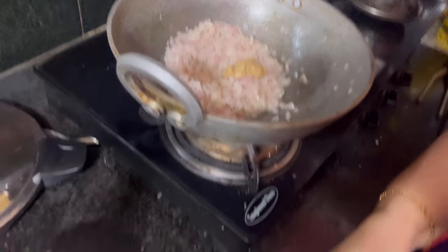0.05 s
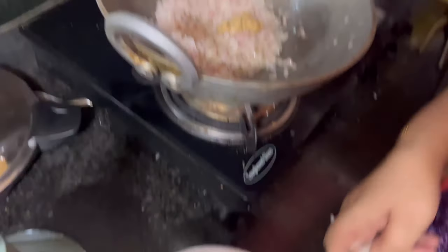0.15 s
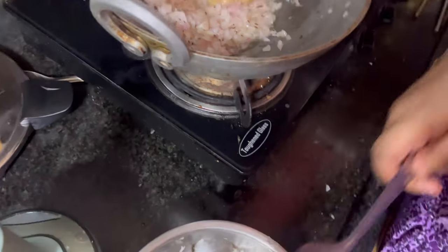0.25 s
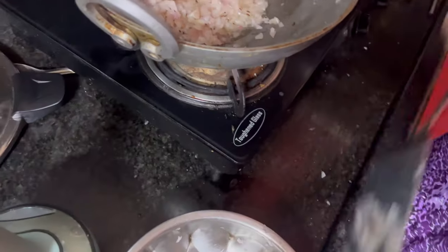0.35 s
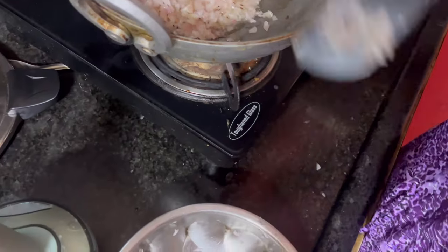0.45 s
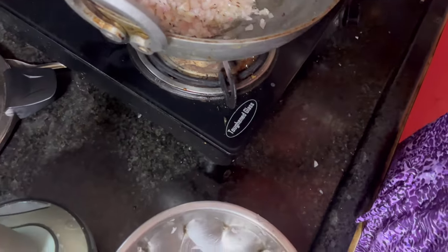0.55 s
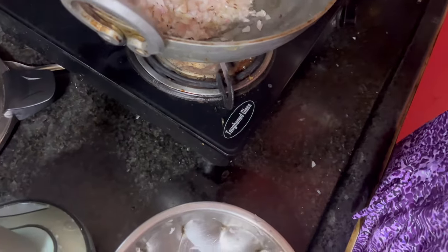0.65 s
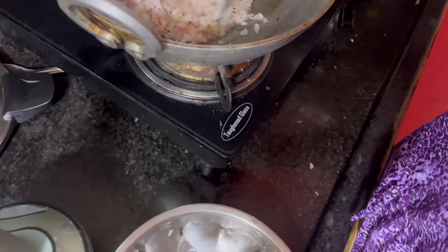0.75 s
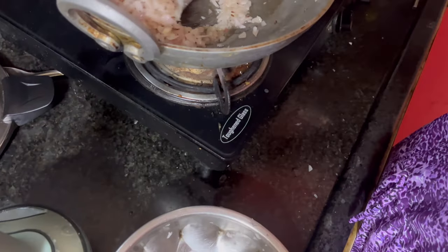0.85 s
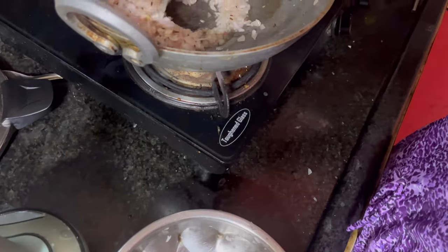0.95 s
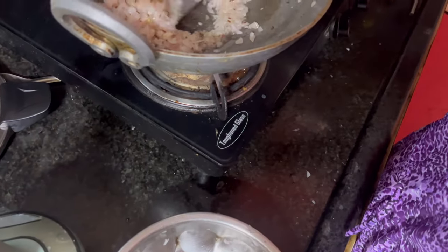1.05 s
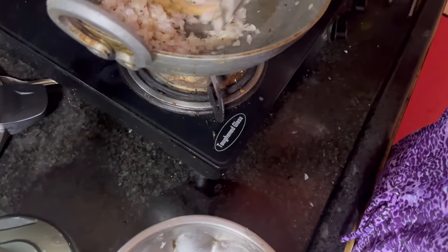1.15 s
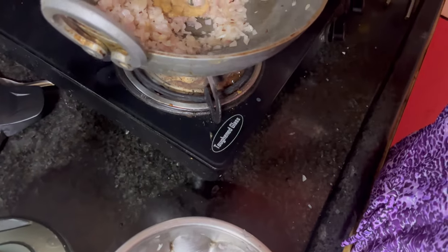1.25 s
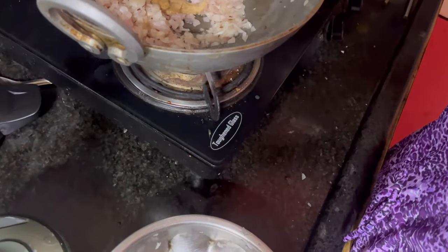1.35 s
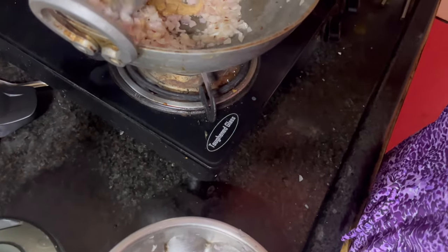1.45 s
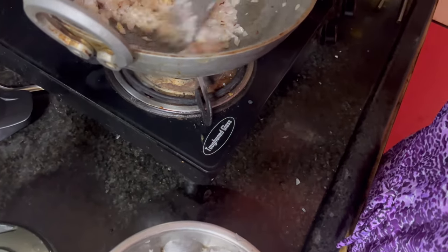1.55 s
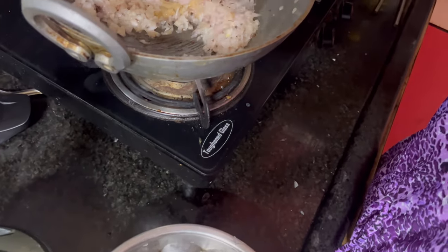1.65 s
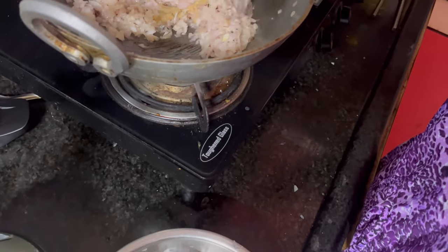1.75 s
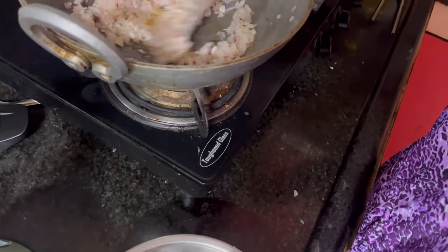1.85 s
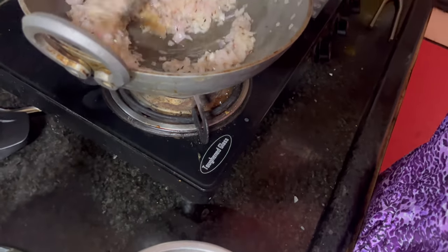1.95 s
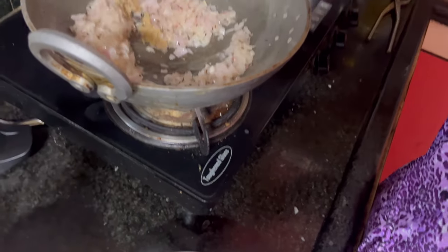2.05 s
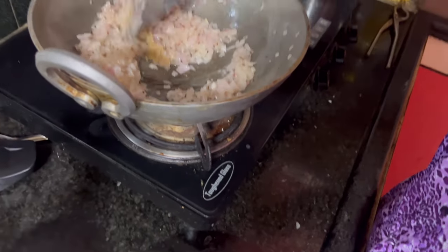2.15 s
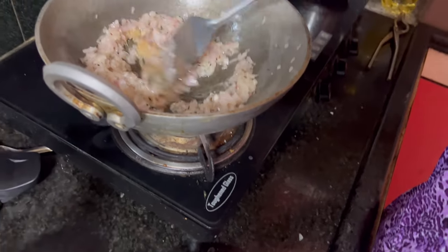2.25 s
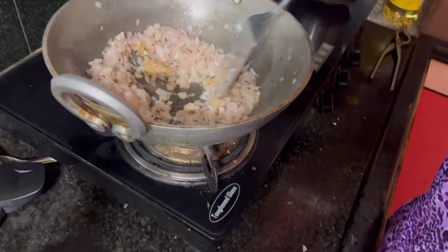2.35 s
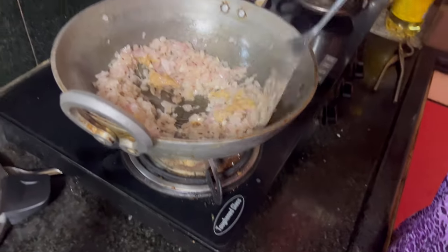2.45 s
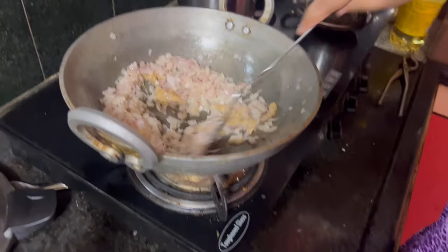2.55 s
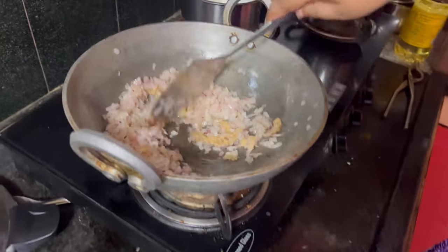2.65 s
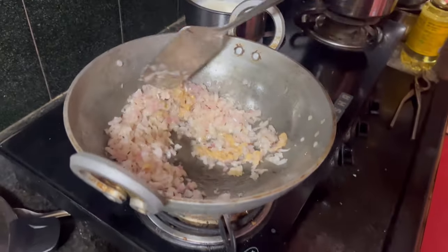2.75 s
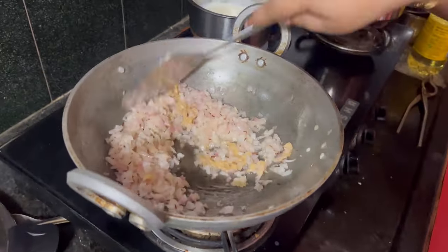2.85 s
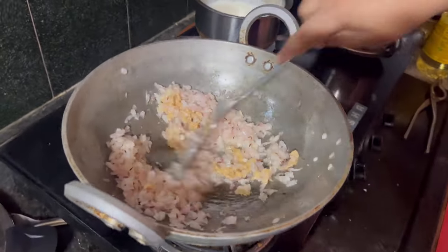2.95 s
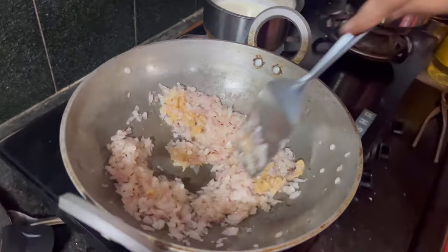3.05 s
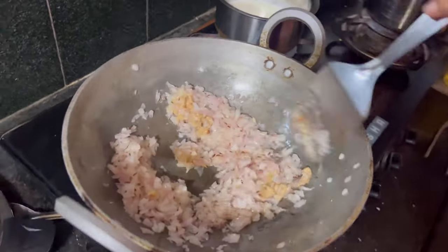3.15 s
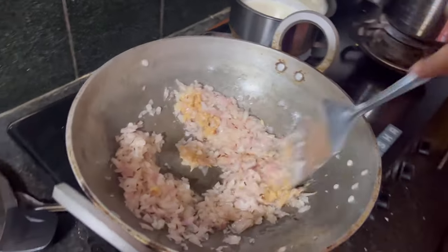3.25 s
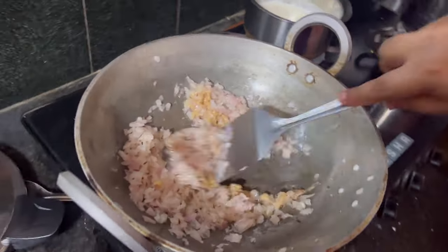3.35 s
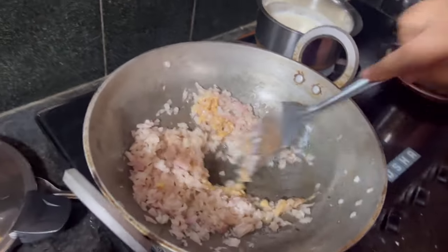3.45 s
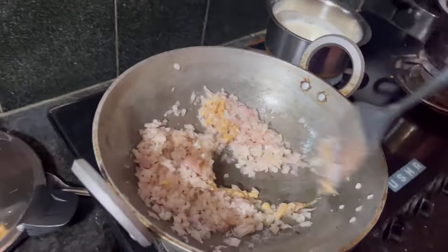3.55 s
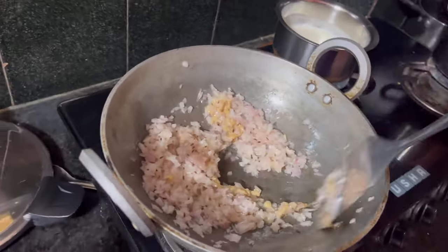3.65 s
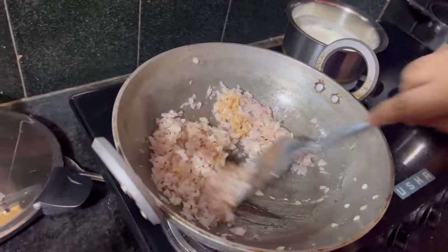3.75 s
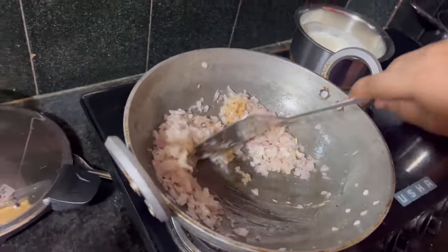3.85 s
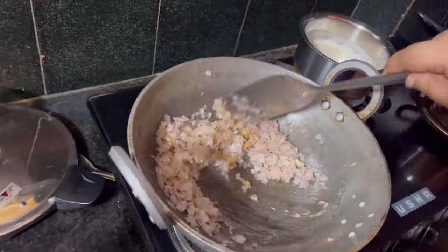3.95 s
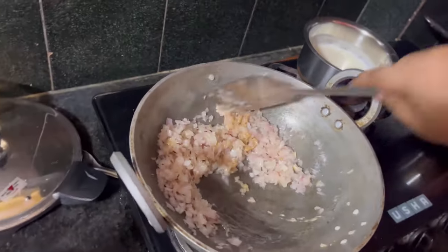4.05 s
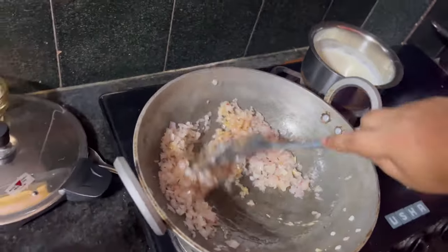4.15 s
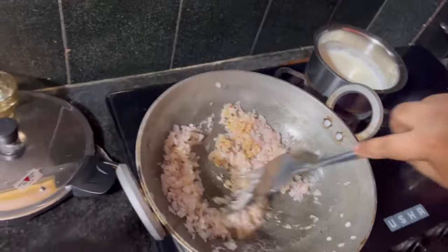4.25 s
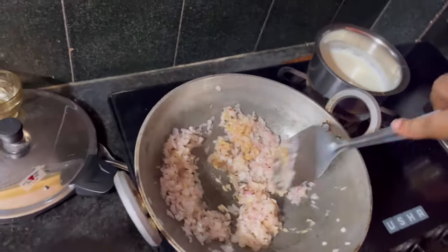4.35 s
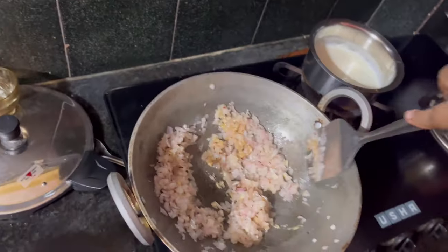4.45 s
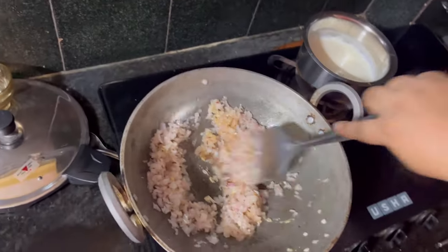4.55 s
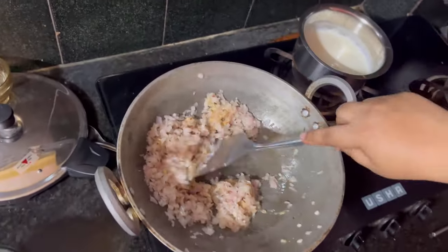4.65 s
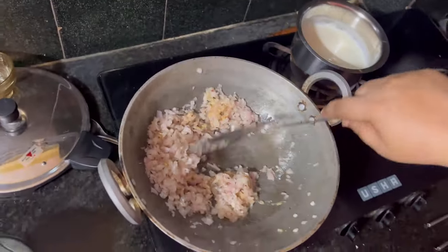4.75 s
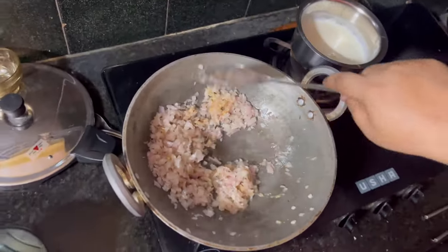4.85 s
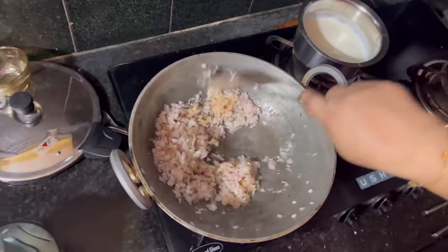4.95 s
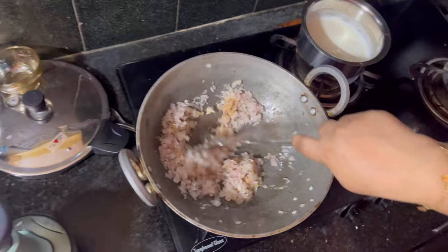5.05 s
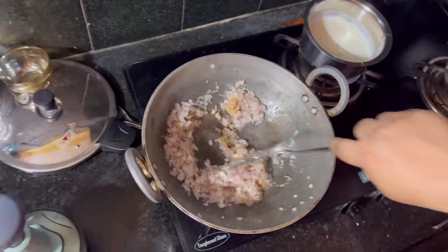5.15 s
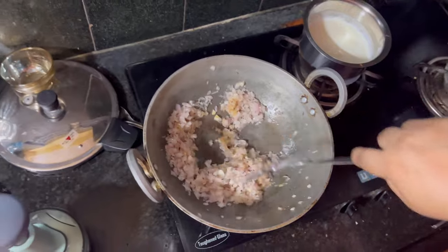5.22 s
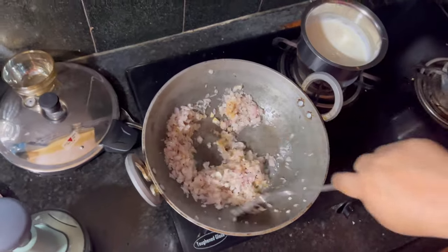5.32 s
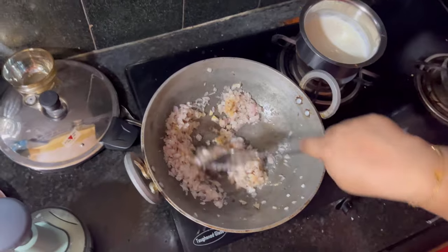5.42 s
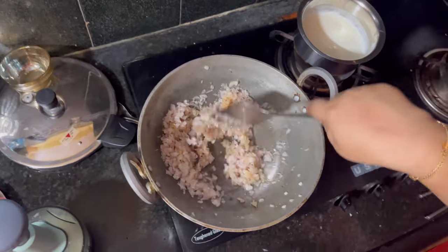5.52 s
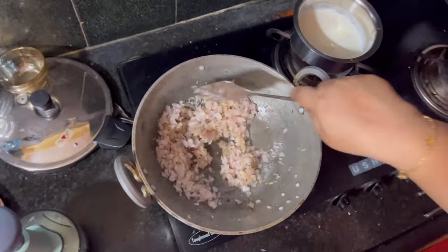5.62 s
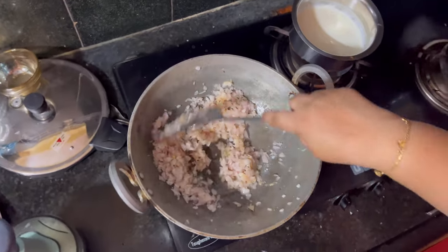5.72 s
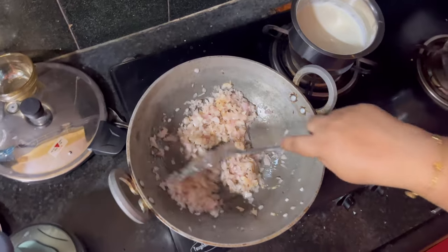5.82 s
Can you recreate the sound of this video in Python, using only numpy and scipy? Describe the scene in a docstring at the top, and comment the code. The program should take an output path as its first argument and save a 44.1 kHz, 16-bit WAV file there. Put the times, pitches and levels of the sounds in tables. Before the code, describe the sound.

In a small tiled kitchen, a steel spatula is dragged from a thin metal bowl with a ringing clank and low groan. After a quieter gap it stirs onions in a metal pan: sharp clanks, brief scrapes and muffled knocks, about two a second later on. Faint sizzle and gas flame run underneath. Close phone microphone, mono.

```python
"""Spatula, bowl and frying onions

In a small tiled kitchen a steel spatula is dragged out of a steel bowl, then stirs onions in a metal pan.
Its blade clanks, scrapes and knocks: showers of tiny impacts ring the modes of the vessel.
The bowl groans and the pan hums as sums of sines; pushed onions rustle as band-passed grains.
Shaped noise makes the faint sizzle and the gas flame; the tiles answer each touch of the blade on metal.
A phone microphone takes it all from one point, in mono."""
import sys
import numpy as np
from scipy import signal
from scipy.fft import rfft, irfft, next_fast_len
from scipy.io import wavfile
from scipy.ndimage import map_coordinates

SR = 44100
rng = np.random.default_rng(int(sys.argv[2]) if len(sys.argv) > 2 else 0)


def to_wav(s):
    """Save 16-bit WAV."""
    ch = np.atleast_2d(s).T  # columns
    pcm = np.round(np.clip(ch, -1, 1) * 32767)  # PCM
    wavfile.write(sys.argv[1], SR, pcm.astype(np.int16))


N = 259308
BOWL_UNTIL = 1  # s, contacts starting before this are on the bowl, later ones on the pan


def amp(db):
    """Decibels to gain."""
    return 10 ** (np.asarray(db) / 20)


def unit(x):
    """Scale to rms 1."""
    return x / np.sqrt(np.mean(x ** 2) + 1e-20)


def clock(seconds):
    """Sample times from zero."""
    return np.arange(int(seconds * SR)) / SR


def along(points, hz):
    """Join (Hz, value) points on a log frequency axis."""
    points_hz, values = np.transpose(points)
    return np.interp(np.log(hz + 1), np.log(points_hz), values)


def filtered(x, response):
    """Apply a gain that depends on frequency."""
    size = next_fast_len(len(x) + 8192)
    gain = response(np.fft.rfftfreq(size, 1 / SR))
    return irfft(rfft(x, size) * gain, size)[:len(x)]


def coloured(x, spectrum):
    """Weight x by a spectrum in dB and scale it to rms 1."""
    return unit(filtered(x, lambda hz: amp(along(spectrum, hz))))


def band(x, lo_hz, hi_hz, order):
    """Causal band-pass."""
    edges_hz = [lo_hz, min(hi_hz, SR / 2 - 1)]
    return signal.sosfilt(signal.butter(order, edges_hz, 'bandpass', fs=SR, output='sos'), x)


def add(track, s, sound):
    """Mix a sound in at time s, cut to fit the track."""
    start = round(s * SR)
    part = sound[max(-start, 0):max(N - start, 0)]
    track[max(start, 0):][:len(part)] += part


def slips(size, rate, spread_db):
    """Random tiny impacts of uneven strength and either sign, rate a second."""
    lands = rng.random(size) < rate / SR
    strength = amp(spread_db * rng.standard_normal(size).clip(-2, 2))
    return lands * strength * rng.choice([-1, 1], size)


def wobble(size, rate):
    """A smooth random curve, rate knots a second."""
    knots = rng.standard_normal(int(size * rate / SR) + 4)
    return map_coordinates(knots, [np.arange(size) * rate / SR])


# Modes of pan and blade together: mode_hz [Hz], level_db [dB relative]
PAN = [(352, -16), (420, -12.5), (660, -7), (748, -10.5), (830, -8), (997, -9), (1106, -8.5), (1210, -11.5),
       (1335, -26), (1593, -7), (1665, -2.5), (1884, -8), (2130, -11), (2348, -25), (2778, -4), (3331, -12),
       (4030, -4.5), (4154, -2.5), (4517, -4), (4680, -7.5), (5014, -0.5), (5134, 0), (5444, -11.5),
       (7531, -16.5), (7999, -13), (9280, -31), (10072, -17)]
# Modes of the steel bowl: mode_hz [Hz], level_db [dB relative]
BOWL = [(800, -1.5), (1250, -1), (1500, -1.5), (1593, 0.5), (2140, -4), (2880, 7.5), (3100, -6),
        (3260, 4.5), (3478, 1), (3700, -7), (4220, -1), (4970, -0.5), (5457, -4), (5600, -1), (8550, -5),
        (9750, -15), (10400, -13)]
# Decay of modes damped by food and hand, at freedom 1: mode_hz [Hz], t60_s [s]
RING = [(350, .2), (450, .15), (1600, .1), (4000, .075), (10000, .07)]
# Spectrum of the crowd of weaker plate modes: freq_hz [Hz], level_db [dB per Hz, relative]
PLATE = [(150, 15), (260, -5), (520, -3.5), (780, -2), (1150, 0.5), (1420, -4), (1700, 3), (2400, 2),
         (3100, 3.5), (3650, -1.5), (4300, 3.5), (5500, 1.5), (6300, -6), (10400, -5.5), (11500, -15.5),
         (13500, -13), (15000, -18)]


def metal(force, s, favoured_hz, share_db, plate_db, plate_t60, freedom):
    """Ring the vessel; contact favours one mode, and a pressed blade (freedom < 1) shortens the modes."""
    t = clock(.5)

    def mode(hz):
        t60 = freedom * along(RING, hz)
        return unit(amp(-60 * t / t60) * np.sin(2 * np.pi * hz * t))

    def driven(response):
        return unit(signal.fftconvolve(force, response)[:len(force)])

    vessel = BOWL if s < BOWL_UNTIL else PAN
    ring = sum(amp(db) * rng.choice([-1, 1]) * mode(hz) for hz, db in vessel)
    # Each slip lands on a new spot, so the crowded plate modes add up in energy, with no common phase.
    energy = np.abs(signal.fftconvolve(force ** 2, amp(-60 * t / plate_t60) ** 2)[:len(force)])
    plate = coloured(rng.standard_normal(len(force)), PLATE) * np.sqrt(energy)
    body = unit(driven(ring) + amp(plate_db) * unit(plate))
    return body + amp(share_db) * driven(mode(favoured_hz))


# Registers of the metal, low, mid, high, top: low_edge_hz [Hz], high_edge_hz [Hz]
BANDS = [(340, 1300), (1300, 3850), (3850, 6000), (6000, 17000)]


def voiced(x, band_db, seconds):
    """The angle of the blade sets how strong each register is while the contact lasts."""
    sound = 0
    for (lo_hz, hi_hz), db in zip(BANDS, band_db):
        part = band(x, lo_hz, hi_hz, order=4)
        sound = sound + amp(db) * part / np.std(part[:int(seconds * SR)])
    return sound


# Register balance of a blow on each vessel: low_db, mid_db, high_db, top_db [dB]
PAN_STRUCK = (-3.5, -0.6, 3, -1.5)
BOWL_STRUCK = (-7.5, 8.5, 3, -4.5)


def struck_balance(s, brightness):
    """A bare edge tilts the ring to the treble, onion under the blade to the bass (dB per octave)."""
    octaves = np.log2(BANDS).mean(axis=1)
    balance = np.array(BOWL_STRUCK if s < BOWL_UNTIL else PAN_STRUCK)
    return balance + brightness * (octaves - octaves.mean())


CLANK_MODE_DB = -7  # favoured mode against the rest of the ring, at the usual chatter
CHATTER_S, WANDER_DB = .012, 5  # usual chatter; each doubling moves the blade and weakens that mode
# Blade strikes metal: start_s [s], chatter_s [s, decay constant], level_db [dB before register balance],
# brightness [dB per octave], favoured_hz [Hz]
CLANKS = [(0.072, 0.0067, -43.5, -4, 1654), (0.175, 0.026, -40.5, 2, 2130),
          (0.382, 0.011, -25.5, 1.4, 4247), (0.575, 0.019, -36, -1, 2806), (1.468, 0.0062, -29.5, -2, 1636),
          (1.841, 0.0047, -44.5, -1.5, 1647), (2.901, 0.0042, -22.5, 1.5, 4596),
          (3.253, 0.019, -25, 2.1, 7999), (3.645, 0.021, -26, 2.8, 5195), (4.162, .018, -26, -1.2, 5470),
          (4.493, 0.008, -23, 4, 5017), (4.985, 0.0024, -22.5, 2, 5013), (4.99, 0.0074, -25.5, 0.5, 2340),
          (5.368, 0.017, -24.5, 1.96, 5000), (5.746, 0.016, -26.5, -1, 2822)]


def clanks(blow=0.55, settle=0.0014):
    """A first blow, then the springy blade chatters to rest as a dying shower of impacts."""
    track, t = np.zeros(N), clock(.5)
    for s, chatter, db, brightness, favoured_hz in CLANKS:
        envelope = np.exp(-t / chatter) * (1 - np.exp(-t / settle))
        force = slips(len(t), rate=1000, spread_db=9) * envelope
        force /= np.linalg.norm(force)
        force[0] += blow * np.sqrt(CHATTER_S / chatter)  # the shorter the chatter, the harder the edge lands
        plate_db = 5 if s < BOWL_UNTIL else 1.5  # the thin bowl has more crowded modes
        share_db = CLANK_MODE_DB - WANDER_DB * np.log2(chatter / CHATTER_S)
        ring = metal(force, s, favoured_hz, share_db, plate_db, plate_t60=.03, freedom=1)
        add(track, s, voiced(kitchen(ring), db + struck_balance(s, brightness), 0.044))
    return track


# Register balance of a scrape on each vessel: low_db, mid_db, high_db, top_db [dB]
PAN_SCRAPED = (-3, 6.5, -0.2, -3.5)
BOWL_SCRAPED = (-22, 7, 1.7, -1)
# Gain of each register per dB of squeal: low, mid, high, top [dB per dB]
SQUEAL_SHARES = (-0.067, -0.54, 0.91, 0.31)


def scraped_balance(s, squeal_db):
    """A biting edge squeals in the high register and loses some of its rasp in the middle."""
    balance = np.array(BOWL_SCRAPED if s < BOWL_UNTIL else PAN_SCRAPED)
    return balance + squeal_db * np.array(SQUEAL_SHARES)


SCRAPE_MODE_DB = -1  # favoured mode against the rest of the ring
PRESS_SHARE = 0.33  # part of a scrape over which the hand bears down, before it lets go
# Blade slides on metal: start_s [s], length_s [s], level_db [dB before register balance],
# squeal_db [dB], favoured_hz [Hz]
SCRAPES = [(0.199, 0.039, -30, 6.5, 3090), (0.233, .14, -38.5, 7.5, 2900), (1.91, 0.065, -43, 15, 5145),
           (2.245, 0.084, -47, -0.5, 2776), (2.289, 0.086, -47, 10.5, 4620), (2.544, 0.063, -45, 4, 2160),
           (2.605, 0.041, -39, 15, 4590), (2.977, 0.064, -38.5, 8, 4630), (3.286, 0.051, -32.5, 4.5, 2150),
           (3.321, 0.083, -30.5, 13, 4570), (3.384, 0.068, -40, 9, 4210), (3.771, .12, -37.5, 13, 4530),
           (4.583, .06, -39.5, 6.5, 1598), (4.62, 0.032, -33.5, 14, 4730), (5.03, 0.082, -32.5, 6, 5130),
           (5.39, 0.037, -32.5, 9, 5450), (5.435, 0.057, -39.5, 10, 4610)]


def scrapes():
    """The edge sticks and slips in uneven bursts as the hand presses and lets go."""
    track, t = np.zeros(N), clock(.5)
    for s, length, db, squeal_db, favoured_hz in SCRAPES:
        pressure = np.interp(t / length, [0, PRESS_SHARE, 1], [.25, 1, .15]) * (t < length)
        on_rim = s < BOWL_UNTIL  # on the bowl's rim the blade bites harder and stutters
        judder_db = 9 if on_rim else 3.5
        pressure *= amp(judder_db * wobble(len(t), rate=220).clip(-1.5, 1))
        force = slips(len(t), rate=1900, spread_db=2.5) * pressure
        freedom = .38 / (1 + on_rim)
        ring = metal(force, s, favoured_hz, SCRAPE_MODE_DB, plate_db=-2.5, plate_t60=.008, freedom=freedom)
        add(track, s, voiced(kitchen(ring), db + scraped_balance(s, squeal_db), length))
    return track


# Dull knocks of the blade, mostly cushioned by onion: start_s [s], level_db [dB], pitch_hz [Hz]
KNOCKS = [(0.088, -31.5, 952), (1.474, -32, 694), (2.356, -35, 905), (2.512, -34, 970), (3.063, -28.5, 936),
          (3.128, -40.5, 613), (3.213, -34, 950), (3.367, -27.5, 994), (3.435, -41.5, 770),
          (4.175, -32, 688), (4.295, -42, 960), (4.732, -35.5, 982), (4.903, -44.5, 980), (5.05, -31, 720),
          (5.76, -28, 883), (5.868, -35.5, 960)]


def knocks(width=1.29, judder=0.0098, cushion=0.014):
    """Cushioned blows build up softly; only a band around the pitch and a low thud are heard."""
    track, t = np.zeros(N), clock(.5)
    for s, db, hz in KNOCKS:
        envelope = np.exp(-t / judder) * (1 - np.exp(-t / cushion))
        force = slips(len(t), rate=640, spread_db=6.0) * envelope
        ring = metal(force, s, hz, share_db=-12, plate_db=3, plate_t60=.02, freedom=.3)
        thud = amp(-10) * unit(band(ring, 250, 700, order=3))
        tone = unit(band(ring, hz / width, hz * width, order=2))
        dull = kitchen(tone + thud)
        add(track, s, amp(db) * dull / np.std(dull[:SR // 20]))
    return track


# The whole pan flexing: mode_hz [Hz], level_db [dB re the blow, before a random spread]
HUM = [(163, -34), (233, -20.5), (275, -21), (352, -34)]


def pan_hum(t60=0.74, spread_db=2):
    """Every clank on the pan leaves its slow bending modes humming, as decaying sines."""
    track, t = np.zeros(N), clock(.8)
    for s, chatter, blow_db, *_ in CLANKS:
        if s > BOWL_UNTIL:
            modes = 0
            for hz, db in HUM:
                modes = modes + amp(db + spread_db * rng.standard_normal()) * np.sin(2 * np.pi * hz * t)
            add(track, s, amp(blow_db - 60 * t / t60) * (1 - np.exp(-t / chatter)) * modes)
    return track


# The bowl bending under the drag: mode_hz [Hz], level_db [dB rms at drag 1]
FLEX = [(161.5, -40), (355.3, -37.5), (748.3, -49.5)]


def bowl_flex(start=0.11, ramp_end=0.32, end=0.31, t60=0.43):
    """The thin bowl groans while the blade is drawn over its rim, then its bending modes die away."""
    t = np.arange(N) / SR
    drag = np.interp(t, [start, ramp_end, end], [0, 1.2, .6]) * amp(-60 * np.maximum(t - end, 0) / t60)
    return drag * sum(amp(db) * np.sqrt(2) * np.sin(2 * np.pi * hz * t) for hz, db in FLEX)


# Onions pushed over the hot metal: start_s [s], length_s [s], level_db [dB before the swell], pitch_hz [Hz]
SWISHES = [(-0.04, 0.19, -41.5, 2030), (1.194, 0.31, -48.5, 4020), (5.142, 0.23, -46, 2450)]


def swishes(width=1.22):
    """Wet pieces rustle softly ahead of the blade: band-passed grains that swell and fade."""
    track = np.zeros(N)
    for s, length, db, hz in SWISHES:
        t = clock(length)
        grains = band(slips(len(t), rate=4000, spread_db=2), hz / width, hz * width, order=1)
        rustle = unit(band(grains, 300, 3200, order=2))
        add(track, s, amp(db) * rustle * np.sqrt(np.sin(np.pi * t / length)))
    return track


SIZZLE_DB, SIZZLE_DRIFT_DB = -49.5, 2  # level of the frying and its slow drift
# Spectrum of the frying: freq_hz [Hz], level_db [dB per Hz, relative]
SIZZLE = [(240, -70), (400, -24.5), (488, -9.5), (527, -5.5), (726, -3), (796, -6.5), (1240, -6),
          (2550, -12), (3620, -12), (3970, -7.5), (5650, -11), (6190, -23.5), (10100, -19.5), (14100, -50),
          (15500, -38)]
# Spectrum of the gas flame: freq_hz [Hz], level_db [dB per Hz, relative]
FLAME = [(20, -0.5), (45, -20), (65, -10), (120, -13), (165, -9), (300, -7.5), (480, -5.5), (800, -35.5)]


def stove():
    """The hiss of frying onions, noise and tiny bursts, over the low rush of the flame."""
    heat_db = SIZZLE_DB + SIZZLE_DRIFT_DB * wobble(N, rate=2.76) + 0.28 * wobble(N, rate=28)
    bursts = unit(slips(N, rate=1500, spread_db=4))  # tiny steam bursts in the oil
    sizzle = coloured(rng.standard_normal(N) + amp(-7.5) * bursts, SIZZLE)
    flame = coloured(rng.standard_normal(N), FLAME)
    return amp(heat_db) * sizzle + amp(-51.0) * flame


# Decay of the tiled room: freq_hz [Hz], t60_s [s]
KITCHEN = [(200, 0.47), (530, 0.26), (1400, 0.32), (3700, 0.25), (9700, 0.26), (15000, 0.12)]


def kitchen(x, gap=0.0012):
    """Direct sound plus an equally strong answer of the tiles, new for each contact of the blade."""
    hz, t, z = signal.stft(rng.standard_normal(SR // 2), SR, nperseg=256)
    decay = amp(-60 * t / along(KITCHEN, hz)[:, None])
    tail = signal.istft(z * decay, SR, nperseg=256)[1]
    tail *= 1 - np.exp(-np.arange(len(tail)) / SR / gap)  # the answer builds up after the direct sound
    return x + signal.fftconvolve(x, tail / np.linalg.norm(tail))[:len(x)]


def scene():
    """Everything at the stove, heard from one point."""
    return (clanks() + scrapes() + knocks() + pan_hum() + bowl_flex() + swishes() + stove())[None]


TOP_HZ = 15250  # band limit of the phone


def record(dry):
    """The phone rounds off the highest peaks and cuts steeply above its band limit."""
    rounded = dry[0] / (1 + (np.abs(dry[0]) / .9) ** 8) ** (1 / 8)
    return filtered(rounded, lambda hz: 1 / np.sqrt(1 + (hz / TOP_HZ) ** 120))[None]


dry = scene()
out = record(dry)
to_wav(out)
```